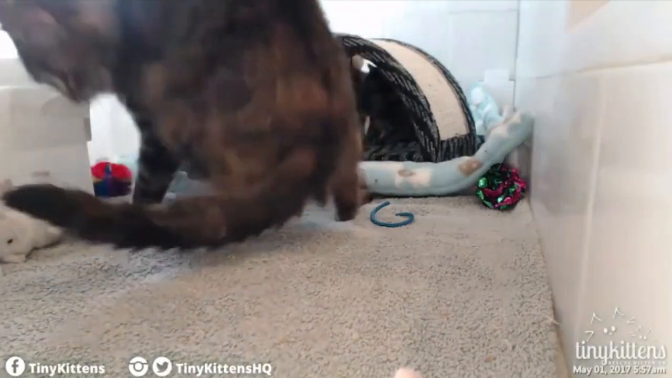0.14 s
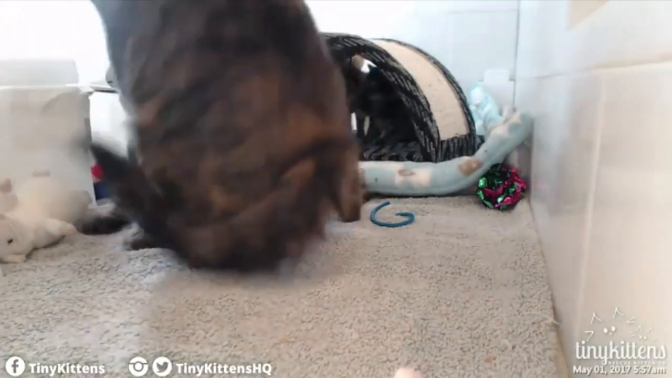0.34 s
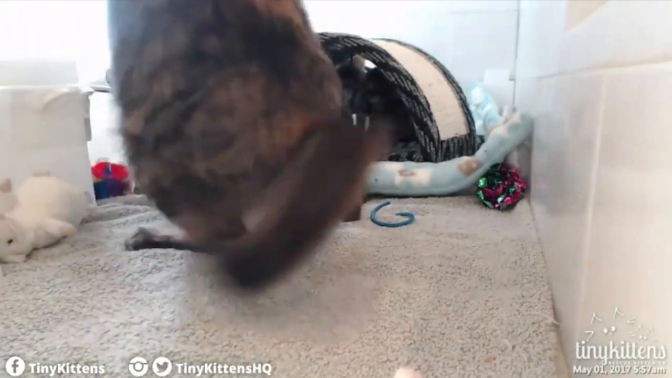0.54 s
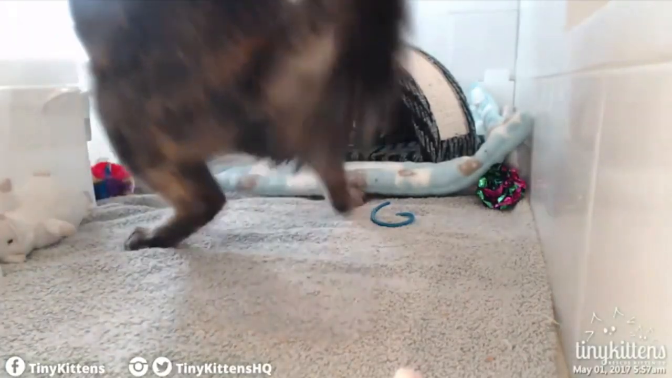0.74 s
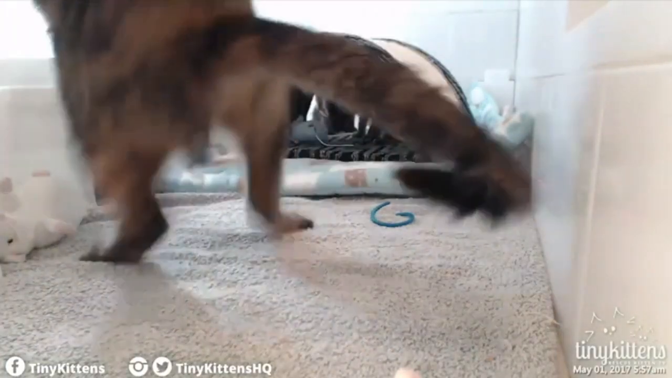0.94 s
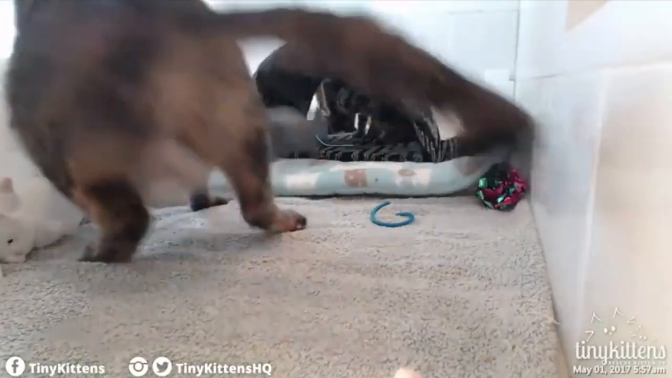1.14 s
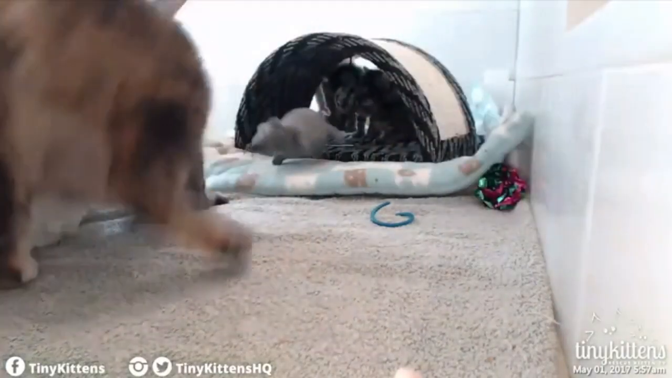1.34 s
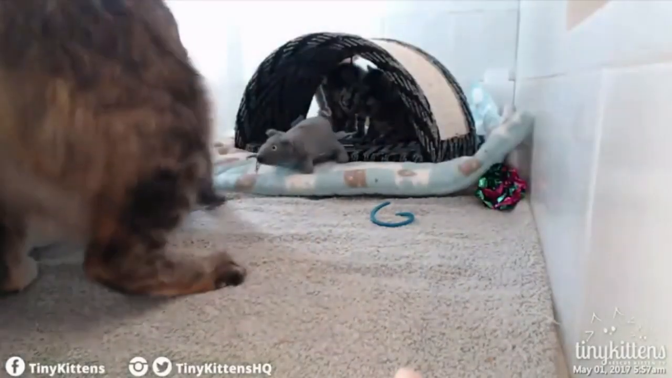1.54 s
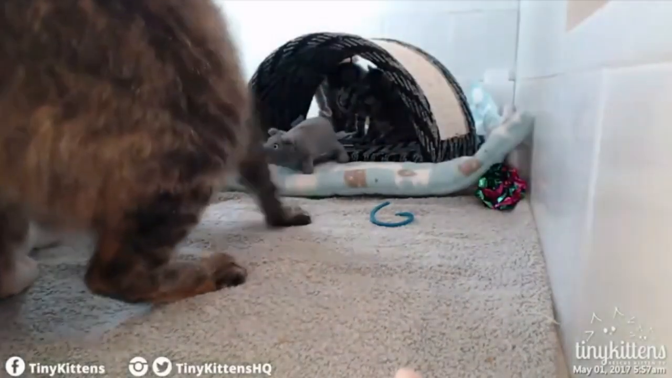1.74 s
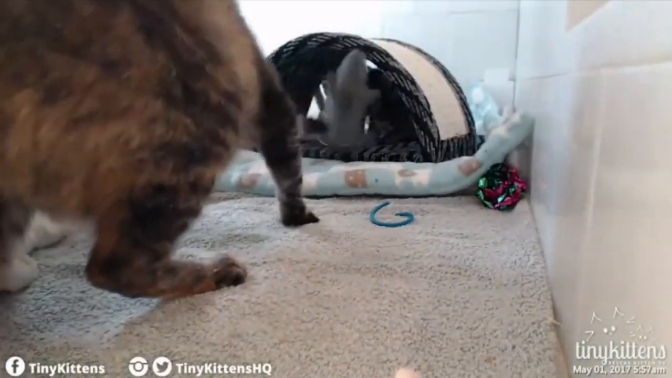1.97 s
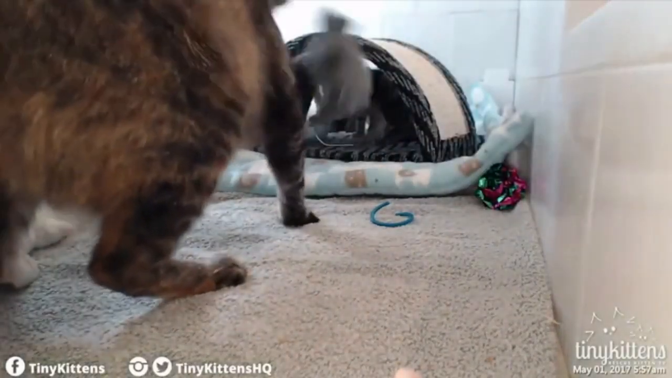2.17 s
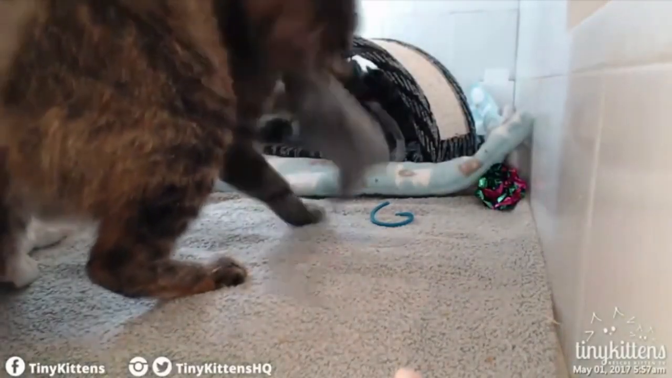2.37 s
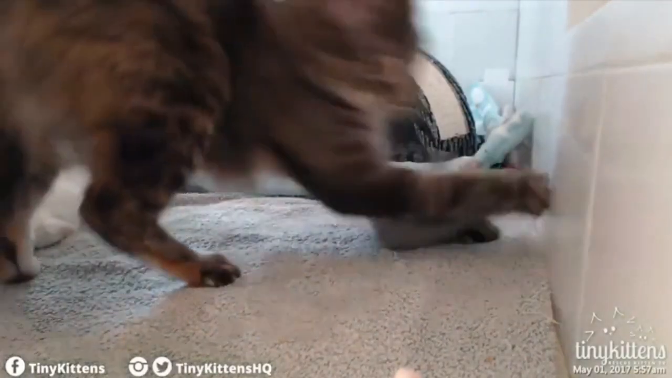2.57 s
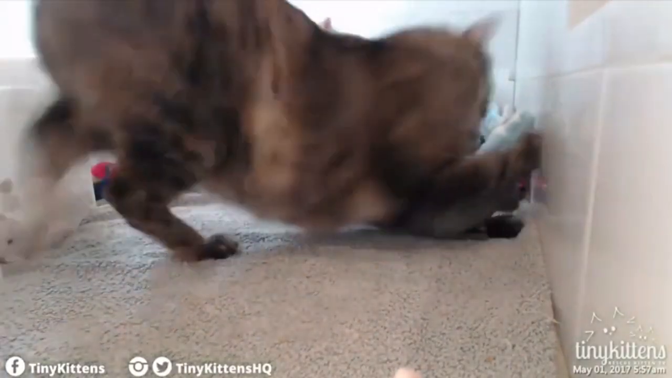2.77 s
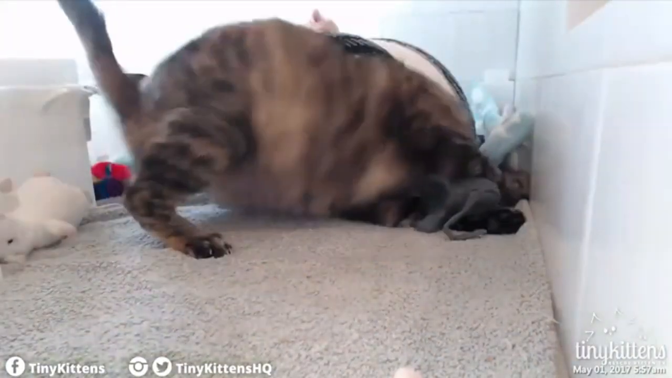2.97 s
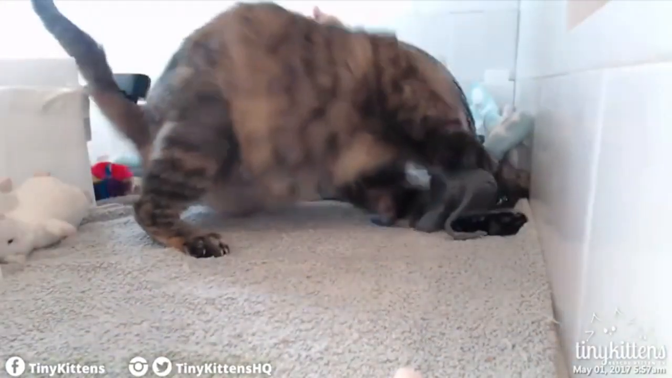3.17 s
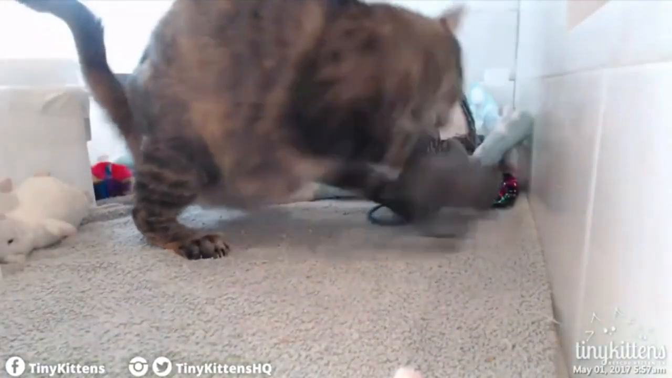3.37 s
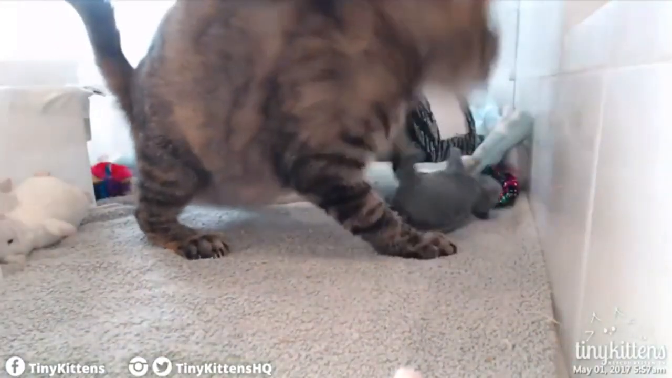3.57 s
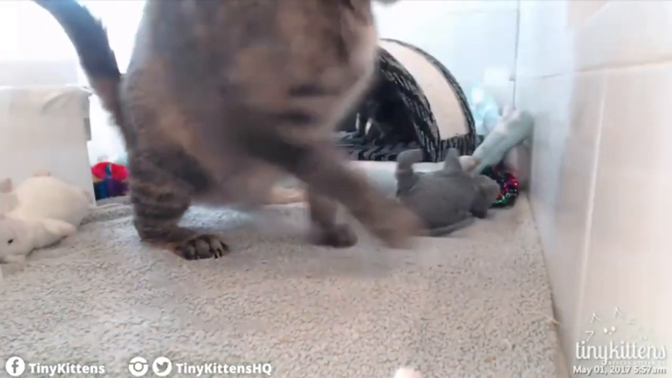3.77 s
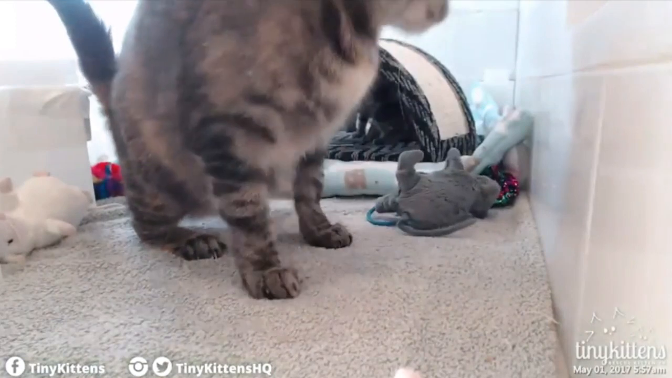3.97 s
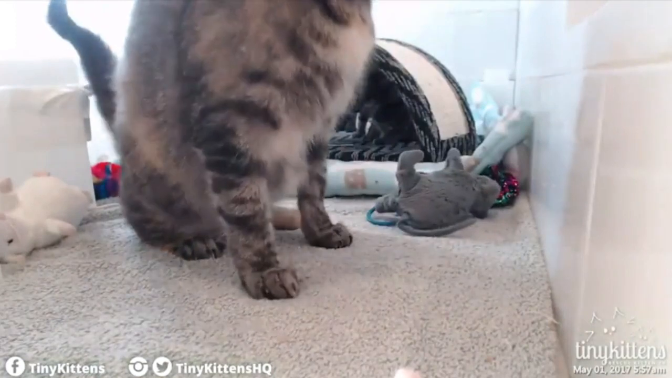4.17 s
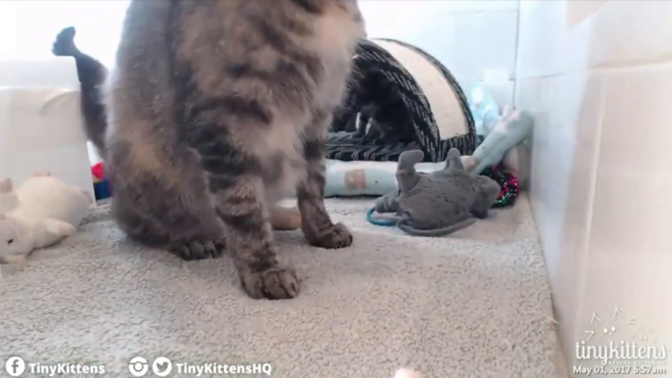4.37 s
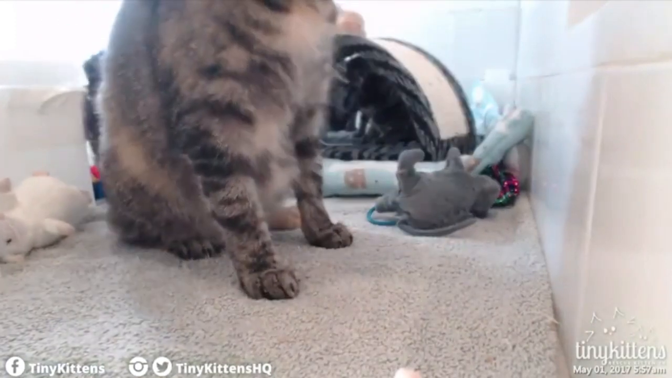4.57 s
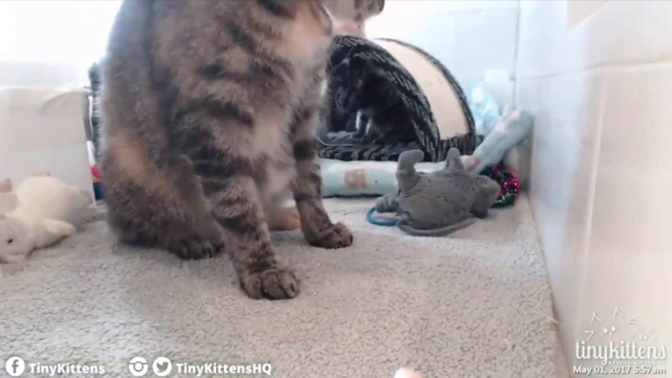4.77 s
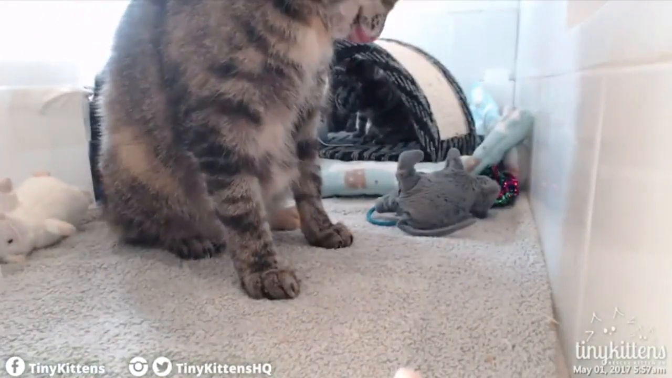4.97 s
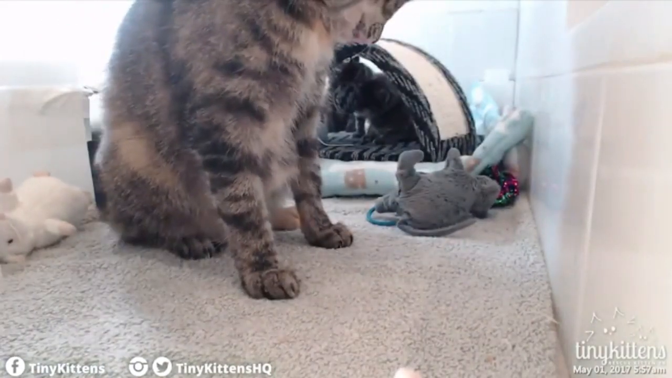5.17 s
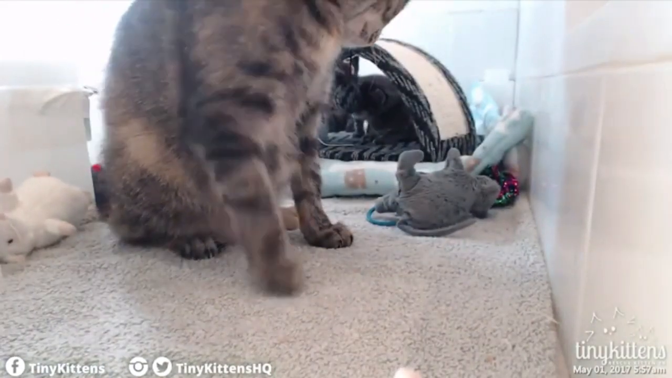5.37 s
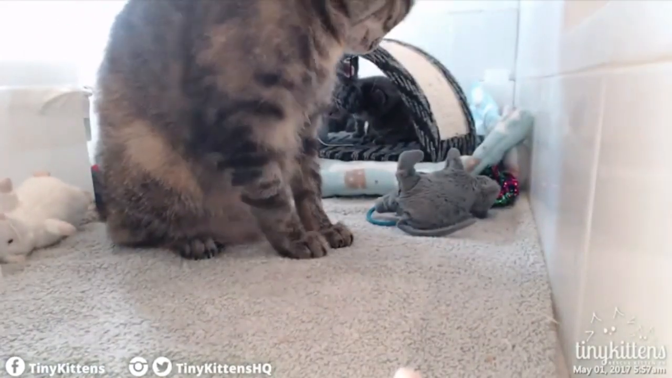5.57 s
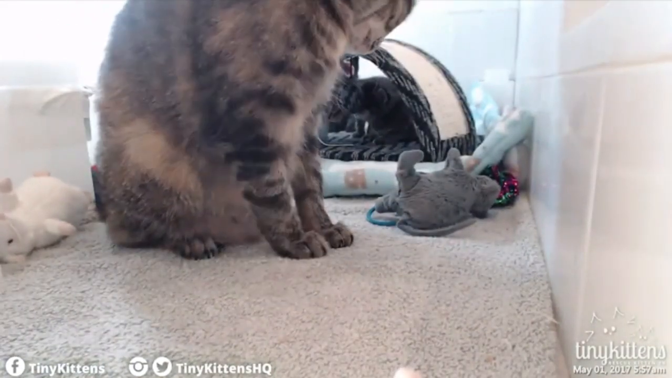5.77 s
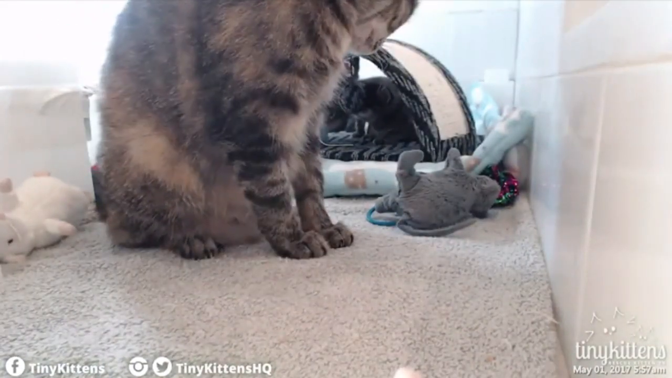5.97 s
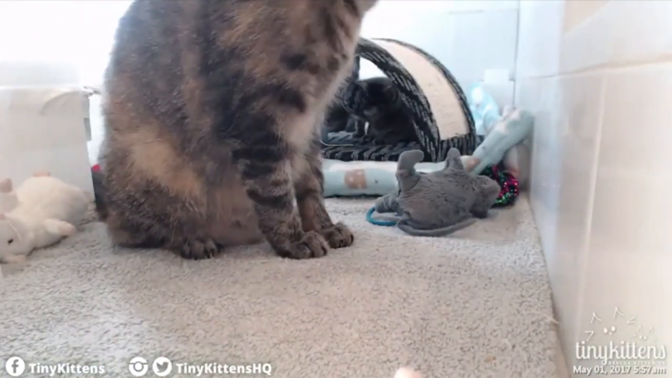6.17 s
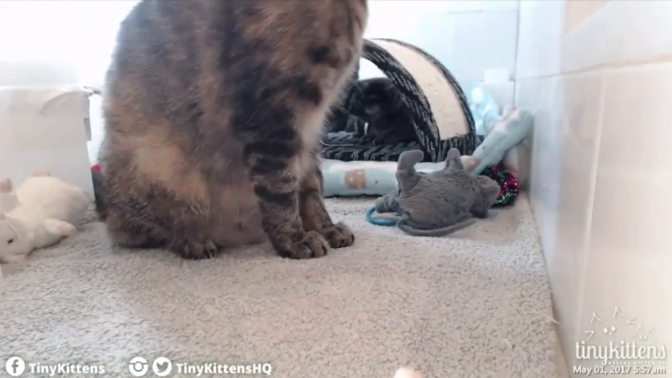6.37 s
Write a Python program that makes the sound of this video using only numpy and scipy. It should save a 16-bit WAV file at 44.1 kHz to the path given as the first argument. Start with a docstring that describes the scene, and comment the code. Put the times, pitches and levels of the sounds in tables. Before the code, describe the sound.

Cats scuffle on carpet in a small room, knocking a stand and smacking a toy down, while ventilation rumbles underneath.

```python
"""Two cats at play on carpet

Two cats play with a soft toy in a small hard-walled room, close to a camera on the floor. Claws drag and
tick in the pile and paws thud; a cat bumps the stand, which rings while the camera rattles on it, and the
toy smacks down with a hollow ringing tail. Ventilation rumbles underneath. The camera adds the buzz
of its focus motor and a faint electrical whine that pulses at its frame rate."""
import sys
import numpy as np
from scipy import signal
from scipy.fft import rfft, irfft
from scipy.io import wavfile
from scipy.ndimage import uniform_filter1d

SR = 44100
rng = np.random.default_rng(int(sys.argv[2]) if len(sys.argv) > 2 else 0)


def unload_audio(sound):
    """Save the sound as a 16-bit wav file, at the path given as the first command line argument."""
    columns = np.transpose(np.atleast_2d(sound))
    # keep every value between -1 and 1, then stretch to whole-number steps
    steps = np.round(np.clip(columns, -1, 1) * 32767)
    wavfile.write(sys.argv[1], SR, steps.astype(np.int16))


N = 282897
FRAME_HZ = 30


def gain_of(db):
    return 10 ** (np.asarray(db) / 20)


def unit_rms(x):
    return x / np.sqrt(np.mean(x ** 2) + 1e-20)


def unit_peak(x):
    return x / np.abs(x).max()


def curve_at(points, hz):
    f, value = np.transpose(points)
    return np.interp(np.log(hz + 1), np.log(f + 1), value)


def add(mix, s, sound):
    part = mix[..., round(s * SR):][..., :sound.shape[-1]]
    part += sound[..., :part.shape[-1]]


def band(x, lo_hz, hi_hz):
    return signal.sosfilt(signal.butter(2, [lo_hz, hi_hz], "bandpass", fs=SR, output="sos"), x)


def panned(x, pan_db):
    return x * gain_of([[pan_db / 2], [-pan_db / 2]])


def resonate(x, hz, width):
    """Resonance: two like resonators in cascade give a peak with steep skirts."""
    pole = np.exp((2j * hz - width) * np.pi / SR)
    for _ in range(2):
        x = 2 * signal.lfilter([1 - abs(pole)], [1, -pole], x).real
    return x


def pair(x, coherence, lag=4):
    """Partial coherence: two microphone ports share part of a noise, the left one lag samples late."""
    right = coherence * x[0] + np.sqrt(1 - coherence ** 2) * x[1]
    return np.array([np.roll(x[0], lag), right])


def room(x):
    """Reverberation: sparse reflections of random sign decay exponentially, each band at its own rate."""
    # likeness of the reflections at the two ports: f/Hz, coherence
    likeness = [(130, 0.96), (630, 1), (1400, -0.42), (3000, -0.071), (15000, -0.7)]
    # reverberation time: f/Hz, T60/s
    decay = [(100, 0.73), (500, 0.42), (1000, 0.58), (2000, 0.46), (4000, 0.42), (10000, 0.58)]
    echoes = np.zeros((2, SR))
    arrivals = np.arange(120, SR - 20, 20) + rng.integers(0, 20, (2, (SR - 121) // 20))
    np.put_along_axis(echoes, arrivals, rng.choice([-1., 1.], arrivals.shape), 1)
    hz, t, spectra = signal.stft(echoes, SR, nperseg=256)
    spectra = pair(spectra, curve_at(likeness, hz)[:, None], lag=0)
    tail = signal.istft(spectra * gain_of(-60 * t / curve_at(decay, hz)[:, None]), SR, nperseg=256)[1]
    return signal.fftconvolve(x[None], tail / np.linalg.norm(tail[0]), axes=1)[:, :N]


def ventilation():
    """Broadband noise, coherent at low frequencies, with narrow duct resonances."""
    # background rumble and hiss, cut off steeply above about 12 kHz: f/Hz, relative spectral level/dB
    spectrum = [(12, -51), (30, -3.5), (45, -2), (76, -9), (150, -6), (195, -17), (420, -23.5), (700, -24),
                (1300, -31), (3000, -38.5), (8500, -44), (11500, -53), (12500, -89), (15000, -82)]
    # likeness of the noise at the two ports: f/Hz, coherence
    likeness = [(60, 0.97), (180, 0.77), (540, 0.17), (1630, 0.027), (4890, 0.06), (14700, 0.057)]
    # duct resonances: f/Hz, width/Hz, level/dB
    ducts = [(55.6, 14.2, -55), (102.3, 10.8, -59.5), (156, 15.3, -58), (379.9, 10.1, -70.5),
             (580, 29, -74), (632.2, 14, -75.5), (671, 4.6, -77), (799, 53, -74.5)]
    hz = np.fft.rfftfreq(8192, 1 / SR)
    a, b, c, d = rng.standard_normal((N // 2048 + 5, len(hz), 4)).T
    spectra = pair([a + 1j * b, c + 1j * d], curve_at(likeness, hz)[:, None], lag=0)
    spectra *= gain_of(curve_at(spectrum, hz))[:, None]
    wash = gain_of(-52.5) * unit_rms(signal.istft(spectra, nperseg=8192, noverlap=6144)[1][:, :N])
    flow = rng.standard_normal(N)
    return wash + sum(gain_of(db) * unit_rms(resonate(flow, f, width)) for f, width, db in ducts)


def camera_whine():
    """Electrical crosstalk: data bursts and sensor tones repeat each frame over a clock's harmonics."""
    # tones heard while data is sent: f/Hz, level/dB
    data_tones = [(7000, -83), (8000, -70), (9000, -86)]
    # sensor tones that restart each frame: f/Hz, left peak level/dB, right peak level/dB
    sensor_tones = [(5470, -68, -78), (10530, -80, -90)]
    # spectral envelope of the clock: f/Hz, relative level/dB
    clock_spectrum = [(3000, -27), (4400, 12.5), (4700, -21), (6400, 6), (7200, -41), (9800, -25),
                      (12000, 2.5)]
    clock_hz, burst_s = 200, .0121
    t = np.arange(N) / SR
    frame_t = (t - .0032) % (1 / FRAME_HZ)
    sending = uniform_filter1d(1. * (frame_t < burst_s), size=30)
    data = sending * np.sqrt(2) * sum(gain_of(db) * np.sin(2 * np.pi * hz * t) for hz, db in data_tones)
    lag_rad = np.c_[[0, 1.9]]
    sensor = sum(gain_of([[left], [right]]) * np.sin(2 * np.pi * hz * frame_t - lag_rad)
                 for hz, left, right in sensor_tones)
    clock = np.zeros(N)
    for hz in clock_hz * np.arange(15, 60):
        db = curve_at(clock_spectrum, hz) + 1.9 * rng.standard_normal()
        clock += gain_of(db) * np.sin(2 * np.pi * (hz * t + rng.random()))
    hiss = unit_rms(resonate(rng.standard_normal(N), 4470, 500))
    return data + sensor + gain_of(-82.5) * unit_rms(clock) + gain_of(-85) * hiss


def carpet_friction():
    """Stick-slip friction: fibres snap one by one over the smooth noise of brushing fur."""
    # spells of fur on carpet: start t/s, end t/s, first level/dB, last level/dB
    spells = [(0.584, 1.55, -66.5, -71), (1.694, 2.503, -72.5, -69), (2.69, 4.084, -56, -70)]
    # paw strokes through the pile: t/s, duration/s, level/dB, treble/dB re level
    strokes = [(0.005, 0.19, -59.5, -22), (0.643, 0.025, -55.5, -18), (0.768, 0.01, -45.5, -12),
               (1.103, 0.032, -52, -15), (1.264, 0.032, -51.5, -12), (1.745, 0.089, -54.5, -16),
               (2.168, 0.025, -57, -23), (2.216, 0.097, -62.5, -12), (2.315, 0.081, -63.5, -20),
               (2.781, 0.066, -44, -8), (3.088, 0.1, -48, -6), (3.34, 0.049, -58, -23),
               (4.486, 0.058, -60.5, -18), (4.632, .04, -66.5, -9), (5.092, 0.11, -68, -7),
               (5.234, 0.016, -64, -15)]
    bands = ((1150, 4360, 0.43), (3540, 9100, -0.64), (197, 1190, 0.99))  # low f/Hz, high f/Hz, coherence
    strength = gain_of(4.6 * np.minimum(rng.exponential(1, N), 3))
    snaps = strength * (rng.random(N) < 700 / SR) * rng.standard_normal((2, N))
    rub = 0.41 * unit_rms(snaps) + 0.69 * rng.standard_normal((2, N))
    envelopes = np.zeros((3, N))  # middle, treble and low band
    for start, end, first_db, last_db in spells:
        ramp_db = np.linspace(first_db, last_db, round((end - start) * SR))
        add(envelopes, start, gain_of(ramp_db + np.c_[[0, -11.5, -2]]))
    for s, length, db, treble_db in strokes:
        swell = signal.windows.tukey(round(length * SR), .6)
        add(envelopes, s, gain_of(db + np.c_[[0, treble_db, -3.5]]) * swell)
    envelopes *= gain_of(2.05 * unit_rms(band(rng.standard_normal((3, N)), 22, 116)))  # catch and slip
    out = sum(envelope * unit_rms(band(pair(rub, coherence), lo, hi))
              for envelope, (lo, hi, coherence) in zip(envelopes, bands))
    out = panned(out, pan_db=-0.91)
    return out + gain_of(-6) * room(out[1])


def taps():
    """Impact noise: a brief contact gives a broad spectrum, with a dull body below and treble above."""
    # claws, paws and toy landing: t/s, centre level/dB, centre f/Hz, body/dB re centre, left-right/dB
    impacts = [(0.0312, -22.5, 3760, -22, -2), (0.053, -41.5, 2030, -8, -2), (0.2592, -59, 1100, 20, 2),
               (0.6549, -48.5, 1400, 4, 8), (0.7528, -38, 1280, 2, -2), (0.7668, -37.5, 1100, 17.5, 3),
               (0.9467, -49.5, 1800, 4, -4), (0.998, -45, 1560, -0.5, -1), (1.1124, -37.5, 1730, 0.5, 1),
               (1.1357, -24, 2880, -13.5, -1.5), (1.2687, -40.5, 1430, -3, 0),
               (1.2898, -40.5, 1700, 2, -3.5), (1.474, -44.5, 1880, -6.5, -1),
               (1.7504, -33.5, 2030, -6.5, -3), (1.764, -35, 2030, -6.5, 2), (2.0194, -46, 1320, 1, -2),
               (2.208, -43, 3200, 1, -1), (2.2314, -38.5, 2140, -5, -2), (2.5423, -13, 1950, -4.5, -2.5),
               (2.6737, -35.5, 1900, -4, -6), (2.894, -43.5, 3650, -5, -3), (3.0333, -36, 2600, -11, 0),
               (3.108, -42, 3460, 2, 0), (3.1553, -34.5, 2430, -4.5, 2), (3.3539, -39.5, 3050, -6.5, 3),
               (3.374, -37, 2760, -25, -7.5), (3.4627, -28, 1150, -14, 8.5), (3.4747, -29, 1820, -10.5, -8),
               (3.5197, -35, 1140, -14, 15), (3.5317, -26.5, 1520, -18, -3), (3.6358, -41, 2480, -19, -4),
               (3.6529, -43, 2360, -11, 12), (3.682, -26.5, 2020, -8, -6), (3.7246, -40, 1820, -4, -1),
               (3.9417, -43, 1910, -17, 0), (3.9736, -54, 4500, -11, -11), (4.122, -52, 6000, -19, 0),
               (4.436, -51.5, 4330, -13, -3), (4.9012, -47.5, 2280, -9, -1), (5.0905, -30.5, 2270, -8, -3),
               (5.094, -31.5, 1110, -20, 6), (5.2085, -54, 2300, -15, 0), (6.357, -45.5, 2200, -14, -1)]
    t60 = .04
    direct, to_walls, t = np.zeros((2, N)), np.zeros(N), np.arange(4000) / SR
    for s, db, hz, body_db, pan_db in impacts:
        puff = rng.standard_normal((2, len(t))) * gain_of(-60 * t / t60)
        puff[:, 0] += 3  # the first contact is a click
        body = band(band(pair(puff, 0.91), 470, 1080), 470, 1080)
        centre = band(pair(puff, 0.04, lag=0), hz / 1.78, hz * 1.72)
        centre += 0.72 * band(pair(puff, 0.72, lag=0), hz / 1.13, hz * 1.085)
        treble = band(pair(puff, .2, lag=0), 3800, 9500)
        treble_db = -19 - 0.28 * (db + 37)  # harder taps have a smaller share of treble
        tap = unit_peak(centre) + gain_of(body_db) * unit_peak(body)
        tap = gain_of(db) * (tap + gain_of(treble_db) * unit_peak(treble))
        add(direct, s, panned(tap, pan_db))
        colour = np.sqrt(abs(uniform_filter1d(abs(rfft(tap[1])) ** 2, size=40)))
        add(to_walls, s, np.roll(irfft(colour), 120)[:400])  # the walls return its broad colour
    return direct + gain_of(-5.5) * room(to_walls)


def paw_thuds():
    """Damped oscillation: a soft paw sets the floor swinging, downward first."""
    # paws pushing the floor: t/s, peak level/dB, f/Hz, T60/s
    footfalls = [(0.154, -35, 70.4, 0.11), (0.623, -28.5, 105, 0.041), (0.655, -30.5, 252, 0.014),
                 (0.839, -20.5, 82.5, 0.056), (0.867, -28.5, 82.5, 0.079), (0.996, -35.5, 221, 0.019),
                 (1.025, -29, 222, 0.016), (1.049, -31, 89.5, .039), (1.272, -38.5, 232, 0.039),
                 (1.284, -35, 125, .05), (1.755, -33.5, 165, 0.027), (1.769, -41.5, 355, 0.13),
                 (1.774, -38, 81, 0.26), (1.812, -36.5, 220, 0.045), (1.977, -34.5, 286, 0.022),
                 (2.002, -27, 163, 0.015), (2.022, -39.5, 335, .032), (2.242, -37, 78, 0.013),
                 (2.544, -38.5, 290, 0.048), (2.667, -32, 99, .05), (2.845, -31.5, 64.5, 0.056),
                 (3.098, -28.5, 129, 0.023), (3.465, -32.5, 350, 0.017), (3.535, -34.5, 315, 0.022),
                 (3.546, -42, 90, 0.042), (3.684, -33.5, 345, 0.064), (3.709, -36.5, 68.8, 0.15),
                 (5.094, -47.5, 258, 0.039)]
    out, t = np.zeros(N), np.arange(9000) / SR
    attack = 1 - np.exp(-t / 0.00087)
    for s, db, hz, t60 in footfalls:
        swing = -np.sin(2 * np.pi * hz * t) * gain_of(-60 * t / t60) * attack
        add(out, s, gain_of(db) * unit_peak(swing))
    return out + gain_of(-5) * room(out)


def focus_motor():
    """Forced vibration: uneven motor steps, then single nudges, excite the lens barrel's resonances."""
    # barrel modes: f/Hz, width/Hz, relative level/dB (applied to the upper two only)
    barrel = [(1386, 300, 23), (1330, 410, 0), (2350, 280, 10.5), (4120, 1500, -1)]
    (hunt_hz, hunt_width, _), (low_hz, low_width, _), *upper = barrel
    step_hz = 250
    t = np.arange(N) / SR
    steps = np.diff(np.floor(t * step_hz), prepend=0) * (1 + .15 * rng.standard_normal(N))
    buzz = unit_rms(sum(gain_of(db) * resonate(steps, hz, width) for hz, width, db in upper))
    strain = gain_of(np.interp(t, [.375, .4], [-4, 9]))  # the lens meets resistance
    buzz += strain * unit_rms(resonate(steps, low_hz, low_width))
    running = np.clip((t - .329) / 0.0092, 0, 1) * (t < .437)
    hunting = (t > .39) * (t < .755)
    singing = unit_rms(resonate(rng.standard_normal(N), hunt_hz, hunt_width))
    out = gain_of(-63.5) * running * buzz + gain_of(-61.5) * hunting * singing
    click = signal.unit_impulse(3000)
    tick = sum(gain_of(db) * resonate(click, hz, width) for hz, width, db in upper)
    nudge = unit_peak(resonate(click, hunt_hz, width=89)) + gain_of(-6.5) * unit_peak(tick)
    for frame, db in enumerate(rng.normal(-50.5, 3.5, size=10)):
        add(out, .436 + frame / FRAME_HZ, gain_of(db) * nudge)
    return out


def stand_bumps():
    """Structure-borne sound: the stand's modes reach both ports alike; its low sway builds up last."""
    # blows on the stand: t/s, level/dB
    bumps = [(0.7604, -16.5), (.7685, -22.5)]
    # modes of the stand: f/Hz, level/dB re blow, T60/s, rise time/s
    modes = [(85.7, 10, 0.18, 0.017), (126, -0.5, 0.15, 0.004), (292.6, -10, 0.13, 0.0011),
             (388, -14, 0.13, 0.0055), (617, -6, 0.065, 0.0029), (789, -3, 0.11, 0.0013)]
    out, t = np.zeros(N), np.arange(20000) / SR
    ring = sum(gain_of(db - 60 * t / t60) * (1 - np.exp(-t / rise)) ** 2 * np.sin(2 * np.pi * hz * t)
               for hz, db, t60, rise in modes)
    for s, db in bumps:
        add(out, s, gain_of(db) * ring)
    return out


def mount_rattle():
    """Impulse excitation: each knock of the shaken camera on its mount rings the plastic case."""
    # knocks: t/s, peak level/dB, left-right/dB, tightness as a factor on frequency
    knocks = [(0.8428, -25, 2, 1.01), (0.8456, -31, 9, .99), (0.88, -34, 7, 1.3), (0.8846, -39.5, 12, 1.5),
              (0.8876, -33, 3, 1.1), (0.89, -45, 15, 0.92)]
    # modes of the case: f/Hz, relative level/dB, T60/s
    modes = [(1233, 3.5, 0.025), (1580, 3, 0.019), (2320, -10, 0.028), (3010, -15, 0.014),
             (4010, -20.5, 0.039)]
    out, t = np.zeros((2, N)), np.arange(2500) / SR
    attack = (1 - np.exp(-t / 0.0006)) ** 2
    for s, peak_db, pan_db, tight in knocks:
        ring = sum(gain_of(db - 60 * t / t60) * np.sin(2 * np.pi * hz * tight * t)
                   for hz, db, t60 in modes)
        add(out, s, panned(gain_of(peak_db) * unit_peak(ring * attack), pan_db))
    return out + gain_of(-18.5) * room(out[0])


def toy_smack():
    """Decaying resonances: the toy's sharp smack has a hollow ringing tail and a brief clatter."""
    # resonances of the tail: f/Hz, relative level/dB, T60/s
    resonances = [(529, -14, 0.32), (550, -16, 0.75), (677.5, 8, 0.23), (864, -44, 0.24), (908, -4.5, 0.42),
                  (960, -3.5, 0.29), (992, -3, 0.44), (1237, -3, 0.33), (1464, 3, 0.24), (1432, -7, 0.38),
                  (1740, -9, 0.18), (2440, 7, 0.068)]
    strike_s, clatter_s, tick_t60, ticks_per_s = 2.5425, .13, .03, 2000
    out, ring, t = np.zeros((2, N)), np.zeros((2, SR)), np.arange(SR) / SR
    for hz, db, t60 in resonances:
        lag_rad = np.c_[[hz / 900, 0]] * rng.uniform(0.1, 1)  # higher tones tend to lag more on the left
        ring += gain_of(db - 60 * t / t60) * np.sin(2 * np.pi * hz * t - lag_rad)
    add(out, strike_s, gain_of(-35) * ring * (1 - np.exp(-t / 0.00038)))
    ticks = rng.standard_normal(SR) * (rng.random(SR) < ticks_per_s / SR)
    ticks = band(band(ticks[:round(clatter_s * SR)], 494, 1500), 440, 2000)
    ticks *= gain_of(np.linspace(0, -5, len(ticks)))
    damped_ring = ring * gain_of(-60 * t / tick_t60)
    clatter = signal.fftconvolve(ticks[None], damped_ring, axes=1)
    add(out, strike_s, gain_of(-34) * unit_rms(clatter[:, :round((clatter_s + tick_t60) * SR)]))
    return out + gain_of(-8) * room(out[1])


def scene():
    """Superposition: the pressures of all sources add at the two ports."""
    return (ventilation() + carpet_friction() + taps() + paw_thuds() + focus_motor()
            + stand_bumps() + mount_rattle() + toy_smack())


def record(dry):
    """Low-pass filtering: the capsules dull the top octave, the whine leaks in, a band limit follows."""
    dull = signal.sosfilt(signal.butter(2, 13000, fs=SR, output="sos"), dry)
    band_limit = signal.firwin(511, 15300, window=("kaiser", 9), fs=SR)
    return signal.oaconvolve(dull + camera_whine(), band_limit[None], "same")


dry = scene()
out = record(dry)
unload_audio(out)
```